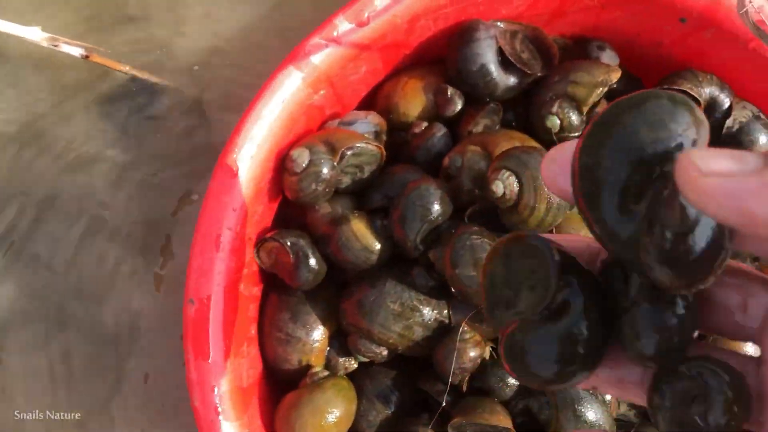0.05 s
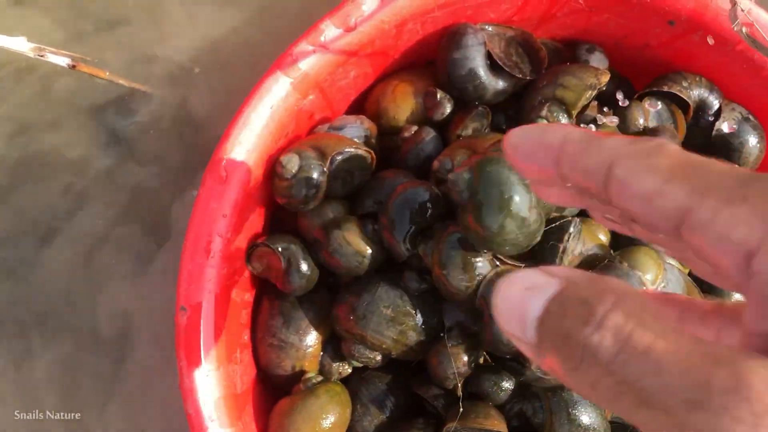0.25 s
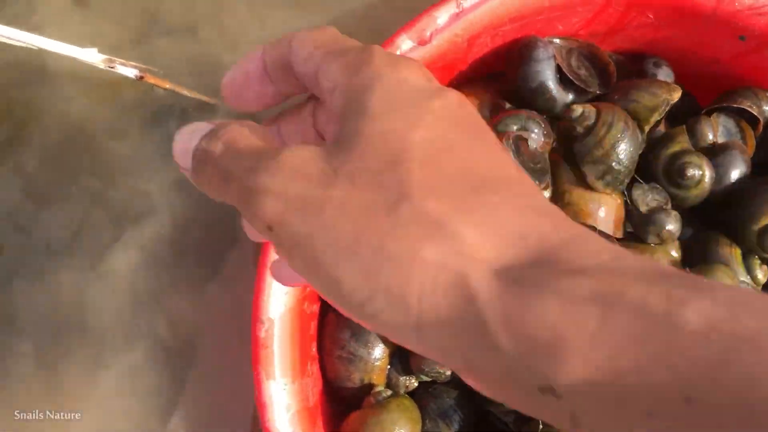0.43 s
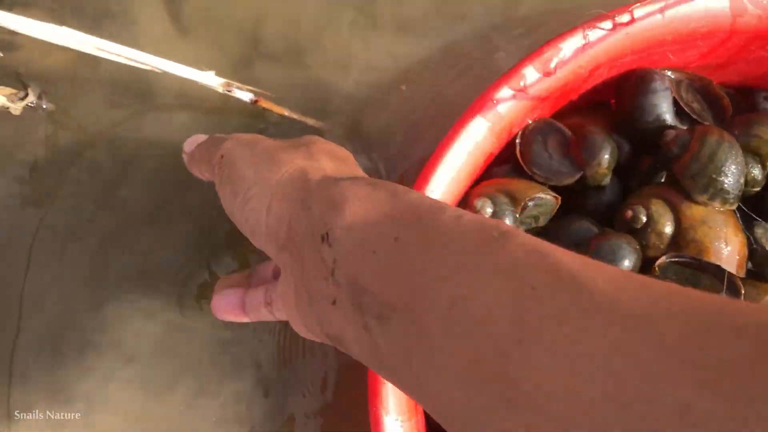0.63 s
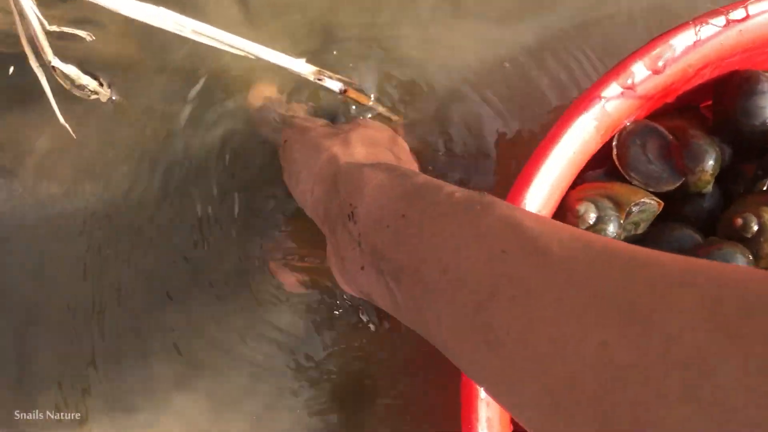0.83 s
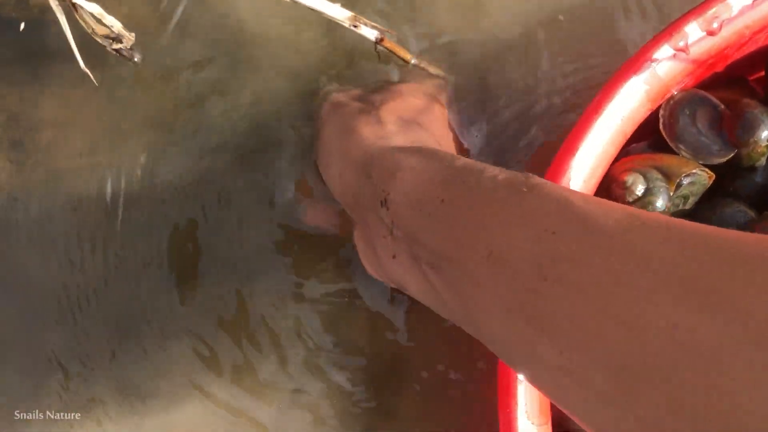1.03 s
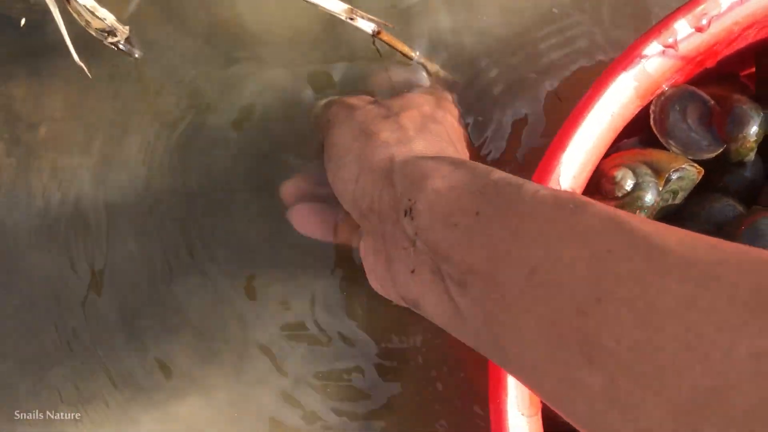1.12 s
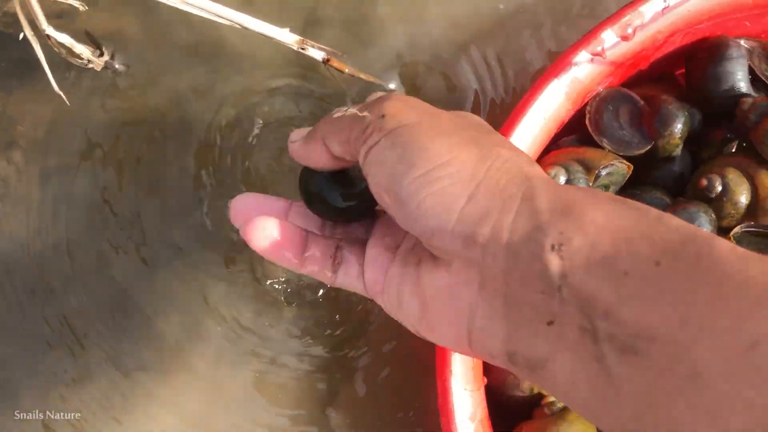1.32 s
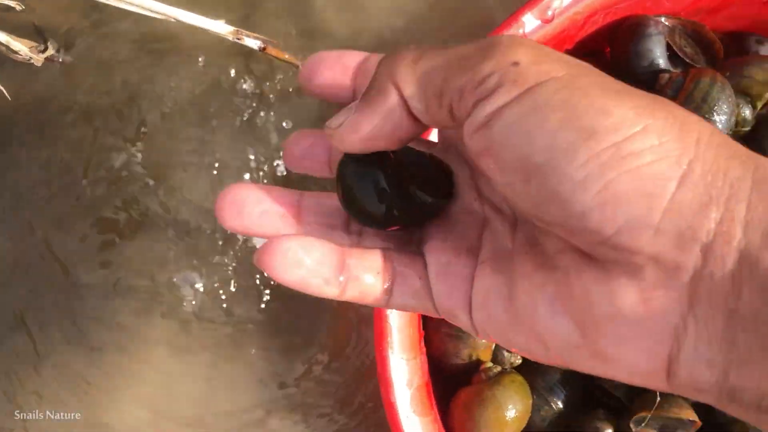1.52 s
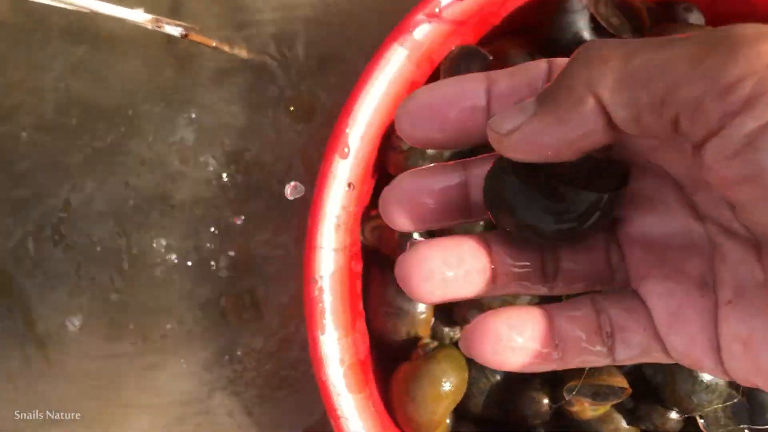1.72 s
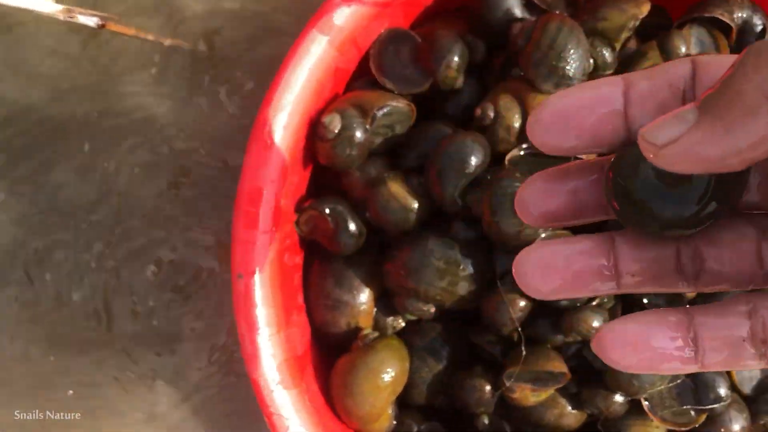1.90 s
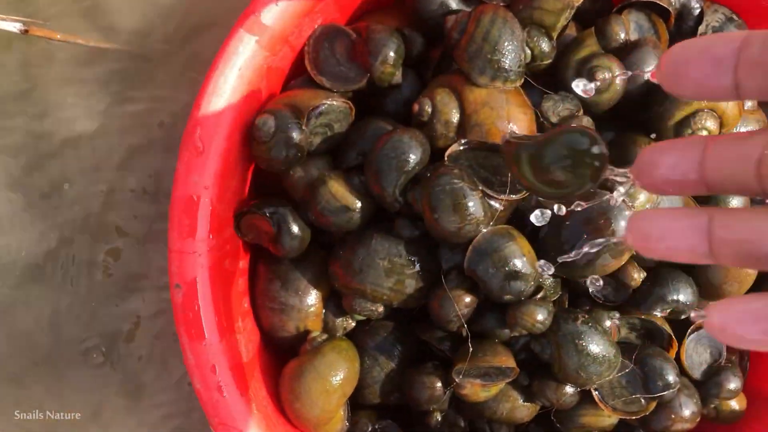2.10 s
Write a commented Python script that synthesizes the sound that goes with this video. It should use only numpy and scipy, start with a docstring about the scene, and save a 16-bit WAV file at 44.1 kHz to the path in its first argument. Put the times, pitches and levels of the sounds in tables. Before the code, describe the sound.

Close up and outdoors, a handful of snail shells clacks onto other shells in a plastic basin, with a few more clicks as they shift. Soft sloshing follows, then small splashes and drips as a hand leaves the water.

```python
"""Snail shells in a floating basin

A handful of wet snail shells drops onto a heap of others in a plastic basin afloat in shallow water.
Each contact cracks, rings a shell's hollow and thumps the basin; the heap rustles as it settles.
The hand dips into the water and comes up dripping, each drop trapping a bubble that rings.
Behind it are outdoor air, a low rumble, a passing hiss and one thin whistle."""
import sys
import numpy as np
from scipy import signal
from scipy.fft import rfft, irfft
from scipy.io import wavfile
from scipy.ndimage import uniform_filter1d

SR = 44100
rng = np.random.default_rng(int(sys.argv[2]) if len(sys.argv) > 2 else 0)


def generate_wav(sig):
    """Save sig (samples, or channels by samples) to the path in sys.argv[1] as 16-bit PCM at SR."""
    pcm = np.round(np.clip(np.atleast_2d(sig).T, -1, 1) * 32767).astype(np.int16)
    wavfile.write(sys.argv[1], SR, pcm)


N = 94815
T = np.arange(N) / SR
HIT_T = T[:SR // 6]


def amp(db):
    """Decibels to gain."""
    return 10 ** (np.asarray(db) / 20)


def unit(x):
    """Scale to rms 1."""
    return x / np.sqrt(np.mean(x ** 2) + 1e-30)


def curve(rows, column=1):
    """Table column, interpolated linearly over time."""
    rows = np.array(rows)
    return np.interp(T, rows[:, 0], rows[:, column])


def swell(peak_s, sigma_s):
    """Gaussian envelope."""
    return np.exp(-((T - peak_s) / sigma_s) ** 2 / 2)


def band(x, hz, width):
    """Band-pass; width is the natural log of the edge ratio."""
    top_hz = min(hz * np.exp(width / 2), SR / 2 - 100)
    sos = signal.butter(2, [top_hz * np.exp(-width), top_hz], "band", fs=SR, output="sos")
    return signal.sosfilt(sos, x)


def colour(x, spectrum):
    """Filter by (freq_hz, gain_db) points; rms 1."""
    hz, db = np.array(spectrum).T
    bins_hz = np.maximum(np.fft.rfftfreq(len(x), 1 / SR), 1)
    gain = amp(np.interp(np.log(bins_hz), np.log(hz), db))
    return unit(irfft(rfft(x) * gain, len(x)))


def add(out, start_s, sound):
    """Mix a sound in at start_s."""
    i = max(int(start_s * SR), 0)
    out[i:i + len(sound)] += sound[:N - i]


def echoes(x, rows):
    """A sound plus its delayed copies."""
    out = x.copy()
    for delay_s, db in rows:
        add(out, delay_s, amp(db) * x)
    return out


def grains(grain, per_s, spread_db):
    """One grain repeated at random times, signs and levels."""
    impulses = (rng.random(N) < per_s / SR) * rng.choice([-1, 1], N)
    sizes = amp(spread_db * np.clip(rng.standard_normal(N), -2, 2))
    return signal.fftconvolve(impulses * sizes, grain)[:N]


def fade(t60_s, hold_s=0):
    """Hold, then exponential decay."""
    return np.exp(-np.log(1000) * np.maximum(HIT_T - hold_s, 0) / t60_s)


def noise_decay(t60_s, hold_s=0):
    """Decaying white noise."""
    return rng.standard_normal(len(HIT_T)) * fade(t60_s, hold_s)


def burst(hz, width, t60_s, hold_s=0):
    """Crowded resonances as decaying band noise; energy of 5 ms at rms 1."""
    x = band(noise_decay(t60_s, hold_s), hz, width)
    return x / np.sqrt(np.sum(x ** 2) / (.005 * SR))


def ring(hz, t60_s, rise_s, glide_oct_per_s=0):
    """Damped tone; its glide levels off over about 20 ms."""
    pitch_hz = hz * 2 ** (glide_oct_per_s * .02 * np.tanh(HIT_T / .02))
    return np.sin(2 * np.pi * np.cumsum(pitch_hz) / SR) * fade(t60_s) * (1 - np.exp(-HIT_T / rise_s))


# freq_hz, gain_db
AIR_SPECTRUM = [(15, -51), (25, -21.5), (55, -2.5), (120, -1.5), (145, -6.5), (256, -12), (416, -23.5),
                (560, -24), (1100, -30), (1330, -32), (2110, -36.5), (2610, -39), (5000, -41), (5430, -44),
                (16000, -51.5)]


def air():
    """Steady outdoor noise, mostly bass."""
    return amp(-53) * colour(rng.standard_normal(N), AIR_SPECTRUM)


# time_s, level_db
WASH_ENVELOPE = [(0, -97), (.2, -75), (.45, -67.5), (.62, -63), (.8, -64.5), (.95, -68.5), (1.2, -73.5),
                 (1.33, -62.5), (1.45, -71), (1.62, -66.5), (1.75, -71), (2.15, -75)]
# freq_hz, gain_db
WASH_SPECTRUM = [(300, 2), (600, -5), (1400, -4.5), (3500, -10.5), (9000, -20), (16000, -25.5)]


def wash():
    """The stirred water surface washes softly."""
    splashes = grains(noise_decay(t60_s=.013), per_s=1500, spread_db=4.5)
    return colour(splashes, WASH_SPECTRUM) * amp(curve(WASH_ENVELOPE))


# centre_hz, level_db, t60_s
HEAP_BANDS = [(900, -13.5, .022), (1300, -13.5, 0.039), (1900, -6, 0.024), (2850, -7.5, 0.02),
              (4300, -4.5, 0.014), (5940, -10, 0.02), (8500, -10.5, 0.01), (13300, -15, .013)]


def heap_clack(tilt_db_per_oct):
    """A contact cracks and sets the heap's crowded resonances clacking."""
    clack = sum(amp(db + tilt_db_per_oct * np.log2(hz / 3000)) * burst(hz, .4, t60_s, hold_s=.0013)
                for hz, db, t60_s in HEAP_BANDS)
    crack = amp(-14 + tilt_db_per_oct) * burst(hz=6884, width=3.4, t60_s=.003)
    return clack + crack


# freq_ratio, level_db
HOLLOW_PARTIALS = [(1, 2), (1.125, -9.5), (2.5, -21)]


def shell_hollow(hz):
    """A shell's hollow rings, excited again as the shell chatters."""
    tone = sum(amp(db) * ring(hz * ratio, t60_s=.012, rise_s=.0005) for ratio, db in HOLLOW_PARTIALS)
    chatter = amp(-12.5) * burst(hz, width=.4, t60_s=.016)
    return tone + chatter


# centre_hz, level_db, t60_s
BASIN_BANDS = [(179, -11.5, 0.0507), (319, -9.5, 0.029), (496.5, -2.5, 0.015), (680, -23.5, 0.066)]


def basin_thud(clack_db):
    """The plastic basin thumps, deeper for harder contacts."""
    medium_clack_db = -31
    bass_db_per_oct = .25 * (clack_db - medium_clack_db)
    return sum(amp(db + bass_db_per_oct * np.log2(500 / hz)) * burst(hz, .45, t60_s)
               for hz, db, t60_s in BASIN_BANDS)


# start_s, clack_db, tilt_db_per_oct, hollow_hz, hollow_db, thud_db
SHELL_CONTACTS = [(0.2206, -22, -4.5, 1810, -14, -32), (0.2274, -23, -1.5, 1910, -23, -37.5),
                  (0.2474, -20, -2.5, 1120, -50, -57), (0.2524, -23.5, -0.5, 1410, -20, -56),
                  (0.2558, -27.5, 2, 4430, -21, -34), (0.2612, -20.5, -4, 1884, -6.5, -29),
                  (0.2637, -25, -4.5, 3300, -11.5, -48), (0.273, -21.5, -1.5, 1820, -16.5, -57),
                  (0.2853, -39.5, -4.5, 2670, -25.5, -64), (0.2919, -45, -7, 1870, -22.5, -65),
                  (0.299, -45, 1.5, 4900, -35, -72), (.3085, -40, 0, 1170, -23, -41.5),
                  (.3153, -26.5, -2.5, 5440, -26.5, -31), (.3203, -31.5, 0, 3100, -21.5, -44),
                  (0.3385, -39, -3, 1520, -34, -55), (0.349, -52, 8.5, 1300, -58, -71),
                  (.351, -39, -7, 1550, -29, -38), (0.358, -57, 9, 1310, -69, -53),
                  (0.3868, -46, -9.5, 1290, -34, -38), (.4245, -47, 1, 1070, -34, -49.5),
                  (.431, -47, -8.5, 1460, -35, -42.5), (0.4963, -31.5, -1, 1580, -25, -45.5),
                  (0.5121, -48, 5.5, 5200, -38, -48), (0.5269, -55, 8, 1600, -33, -43),
                  (.5353, -39, 5.5, 3850, -17.5, -38.5), (0.534, -45, -7, 4340, -17, -56),
                  (0.5379, -51.5, -5, 1420, -24, -31.5), (.570, -36, 6, 1430, -20.5, -37),
                  (.574, -45, -15.5, 1845, -16, -31), (0.5804, -53, 1, 1100, -29, -33.5),
                  (0.5995, -54, 3.5, 2350, -33, -47), (.615, -73, 10, 1400, -43, -48.5)]
# delay_s, gain_db
BASIN_WALL_ECHOES = [(.00228, -14), (.00456, -16.5)]


def shells(thud_lag_s=.0013):
    """Falling shells strike the heap; their hollows echo off the basin wall."""
    impacts, hollows = np.zeros(N), np.zeros(N)
    for start_s, clack_db, tilt_db_per_oct, hollow_hz, hollow_db, thud_db in SHELL_CONTACTS:
        add(impacts, start_s, amp(clack_db) * heap_clack(tilt_db_per_oct))
        add(hollows, start_s, amp(hollow_db) * shell_hollow(hollow_hz))
        add(impacts, start_s + thud_lag_s, amp(thud_db) * basin_thud(clack_db))
    return impacts + echoes(hollows, BASIN_WALL_ECHOES)


# time_s, level_db
RUSTLE_ENVELOPE = [(.22, -66), (.24, -51), (.28, -47), (.33, -49), (.365, -56), (.405, -65), (.44, -62),
                   (.47, -60), (.49, -67), (.56, -63), (.59, -57), (.63, -70), (.7, -90)]
# freq_hz, gain_db
RUSTLE_SPECTRUM = [(200, -4.5), (500, -0.5), (1500, -3.5), (3000, -8.5), (6000, -17), (10000, -20),
                   (16000, -26.5)]


def rustle():
    """Tiny contacts as the settling shells shift against each other."""
    clicks = grains(noise_decay(t60_s=.008), per_s=400, spread_db=3.5)
    gate = T > RUSTLE_ENVELOPE[0][0]
    return colour(clicks, RUSTLE_SPECTRUM) * amp(curve(RUSTLE_ENVELOPE)) * gate


# time_s, level_db
HISS_ENVELOPE = [(.35, -100), (.6, -70), (.68, -67.5), (.78, -75.5), (.98, -100)]
# centre_hz, log_width, gain_db
HISS_NOISE_BANDS = [(5900, .12, -1.5), (6765, 0.24, -5.5)]


def hiss():
    """A faint high hiss comes and goes."""
    noise = sum(amp(db) * unit(band(rng.standard_normal(N), hz, width))
                for hz, width, db in HISS_NOISE_BANDS)
    return amp(curve(HISS_ENVELOPE)) * noise


# start_s, pitch_hz, bubble_db, t60_s, glide_oct_per_s, splash_hz, splash_db
WATER_DROPS = [(.7105, 2630, -52, .015, -16, 3000, -83), (0.7207, 1400, -42.5, 0.029, -5, 6900, -68),
               (.7285, 3300, -51, .01, -18, 5900, -60.5), (0.7537, 7600, -54, .01, -26, 11000, -63),
               (.778, 2623, -50.5, 0.032, -12, 3080, -65), (.8655, 8200, -45.5, .01, -4, 5500, -61),
               (1.054, 5510, -46.5, 0.0059, 10.5, 4650, -64.5),
               (1.0855, 9370, -57.5, 0.0073, 3, 11900, -71), (1.1605, 9500, -64.5, .008, -3, 11970, -67.5),
               (1.257, 12540, -58, .008, 2.5, 12900, -77.5), (1.2817, 11500, -59, .012, -14.5, 13100, -71),
               (1.276, 1350, -56.5, .12, 0.5, 1185, -69), (1.3203, 4160, -43.5, 0.019, -1, 6000, -68.5),
               (1.3224, 1140, -45.5, 0.035, 16.5, 1400, -57), (1.3267, 561, -40.5, 0.03, -7.5, 5370, -56.5),
               (1.329, 1180, -33, 0.017, 7, 1910, -58.5), (1.341, 2480, -57.5, 0.12, 7, 3000, -69.5),
               (1.3552, 6300, -46, 0.0078, 4, 9500, -64), (1.3645, 13300, -59, .008, -6.5, 12000, -69),
               (1.368, 3820, -46, 0.016, 8, 9800, -57), (1.3882, 4920, -41.5, 0.012, 0, 7000, -76),
               (1.4003, 7630, -49.5, 0.0098, 17, 11000, -58.5), (1.4549, 5290, -34, 0.0054, 16, 7900, -64),
               (1.5128, 5050, -30, 0.0085, 9.5, 8000, -55), (1.5408, 12500, -53, .006, -1, 9000, -61),
               (1.5442, 1250, -35.5, 0.06, 19, 2940, -54.5), (1.5603, 4900, -57, 0.0088, -5.5, 8000, -62.5),
               (1.5706, 4520, -21.5, 0.0062, 10, 3400, -38), (1.57, 1824, -28.5, 0.017, -4, 9400, -59),
               (1.573, 1167, -44.5, 0.093, 3, 1500, -55), (1.5937, 2320, -31, 0.017, -6.5, 4120, -49.5),
               (1.6097, 4400, -37, 0.021, 5, 10300, -43), (1.610, 2280, -46.5, 0.065, -1, 3100, -44.5),
               (1.616, 5530, -53, 0.011, 32, 12000, -70), (1.6533, 8470, -39.5, 0.0092, 0, 7000, -50),
               (1.7562, 6360, -61.5, 0.041, 4, 10000, -78), (1.9742, 4950, -51.5, .011, 0, 5030, -64)]
# delay_s, gain_db
DRIP_ECHOES = [(.0021, -18), (.0034, -13), (.0052, -19)]


def drips():
    """Each drop ticks on the surface and traps a ringing bubble; hand, rim and water reflect both."""
    out = np.zeros(N)
    for start_s, pitch_hz, bubble_db, t60_s, glide_oct_per_s, splash_hz, splash_db in WATER_DROPS:
        bubble = ring(pitch_hz, t60_s, rise_s=.0001, glide_oct_per_s=glide_oct_per_s)
        splash = burst(splash_hz, width=.79, t60_s=.0035)
        add(out, start_s, amp(bubble_db) * bubble + amp(splash_db) * splash)
    return echoes(out, DRIP_ECHOES)


# peak_s, level_db
RUMBLE_PEAKS = [(.78, -47.5), (1.569, -50)]


def rumble():
    """A low outdoor rumble swells twice."""
    envelope = sum(amp(db) * swell(peak_s, sigma_s=.042) for peak_s, db in RUMBLE_PEAKS)
    return envelope * unit(band(rng.standard_normal(N), hz=76.2, width=.39))


def fizz():
    """Tiny bubbles burst on the water."""
    pops = grains(burst(hz=10400, width=1, t60_s=.012), per_s=60, spread_db=6)
    return amp(-74.5) * unit(pops) * swell(peak_s=.99, sigma_s=.2)


# time_s, pitch_hz, level_db
WHISTLE_CONTOUR = [(1.64, 4330, -68), (1.685, 4470, -82), (1.725, 5020, -63.5), (1.755, 6100, -72),
                   (1.79, 6380, -70)]


def whistle():
    """A thin rising tone with unsteady pitch."""
    jitter = unit(uniform_filter1d(rng.standard_normal(N), size=30))
    pitch_hz = curve(WHISTLE_CONTOUR) * (1 + .031 * jitter)
    gate = (T > WHISTLE_CONTOUR[0][0]) * (T < WHISTLE_CONTOUR[-1][0])
    return np.sin(2 * np.pi * np.cumsum(pitch_hz) / SR) * amp(curve(WHISTLE_CONTOUR, column=2)) * gate


def open_air_tail(x):
    """Outdoor scatter: a short, soft-edged reverberation."""
    onset = 1 - fade(t60_s=.04)
    scatter = band(noise_decay(t60_s=.16) * onset, hz=1500, width=6.9)
    return signal.fftconvolve(x, scatter / np.sqrt(np.sum(scatter ** 2)))[:N]


def scene():
    """Close shells and drips with their tail, over water and outdoor noise; mono."""
    near = shells() + drips()
    near += amp(-26.5) * open_air_tail(near)
    return (near + rustle() + wash() + fizz() + air() + rumble() + hiss() + whistle())[None]


def record(dry):
    """Steep low-pass."""
    cutoff_hz = 15900
    return signal.sosfilt(signal.ellip(8, .2, 70, cutoff_hz, fs=SR, output="sos"), dry)


dry = scene()
out = record(dry)
generate_wav(out)
```